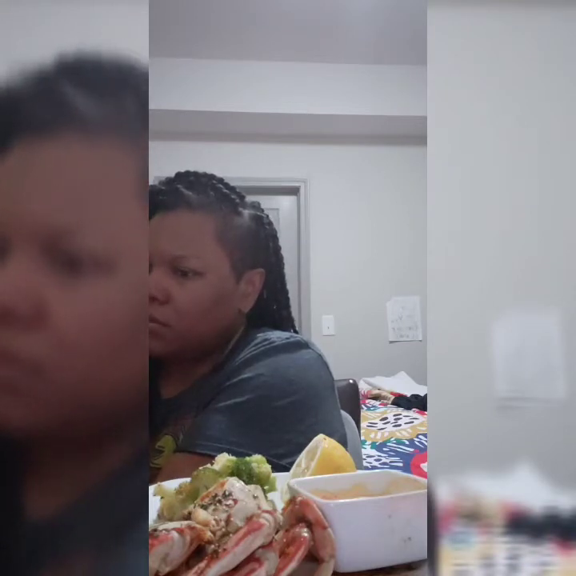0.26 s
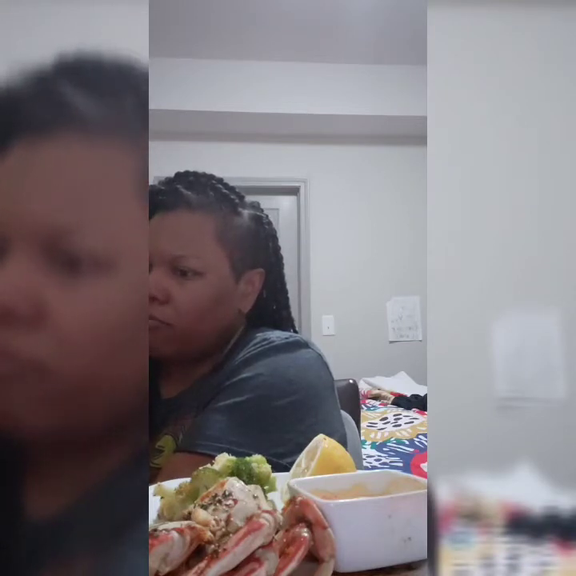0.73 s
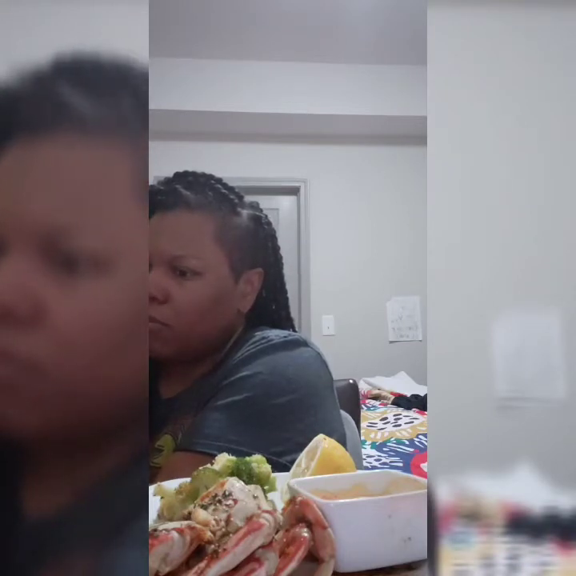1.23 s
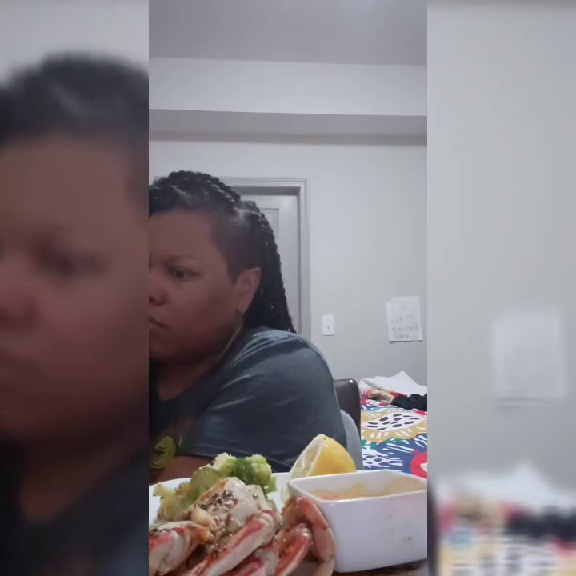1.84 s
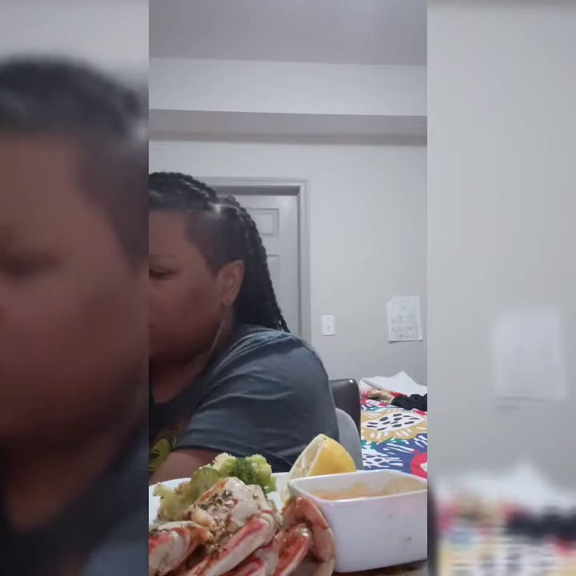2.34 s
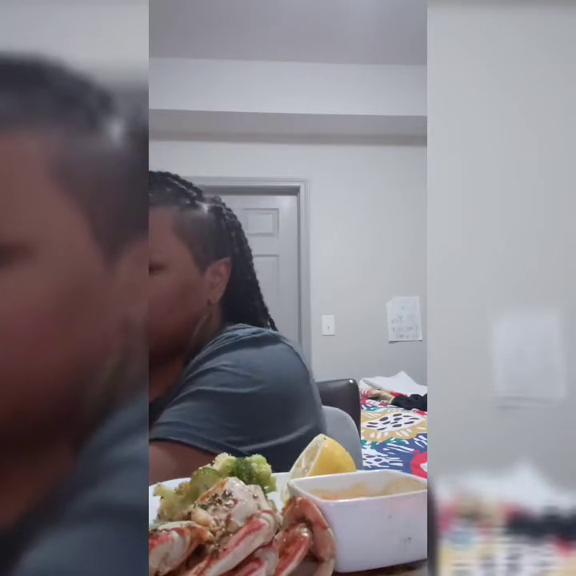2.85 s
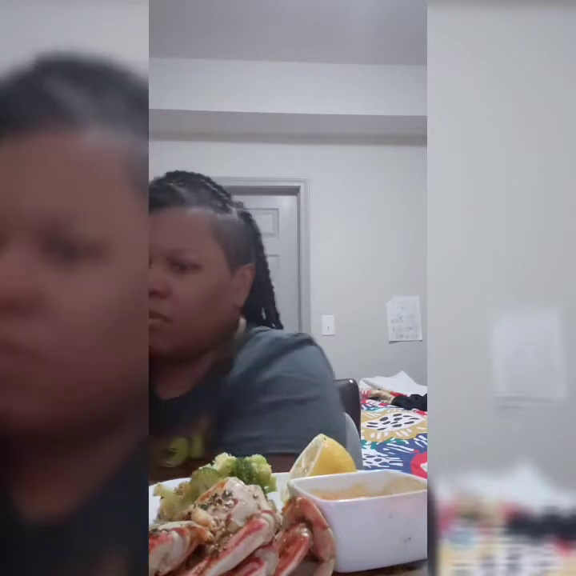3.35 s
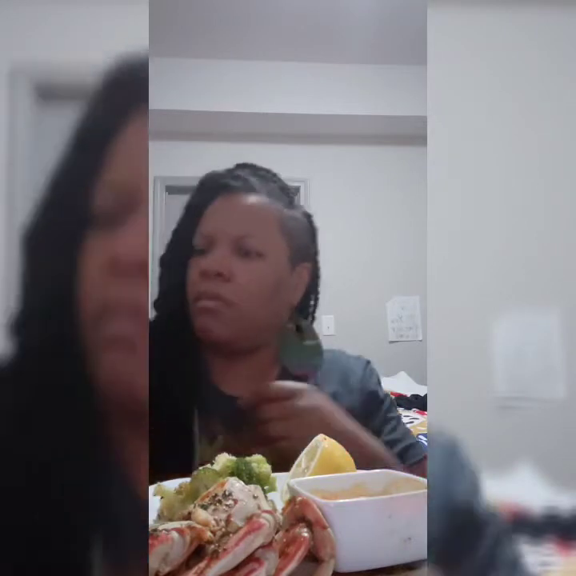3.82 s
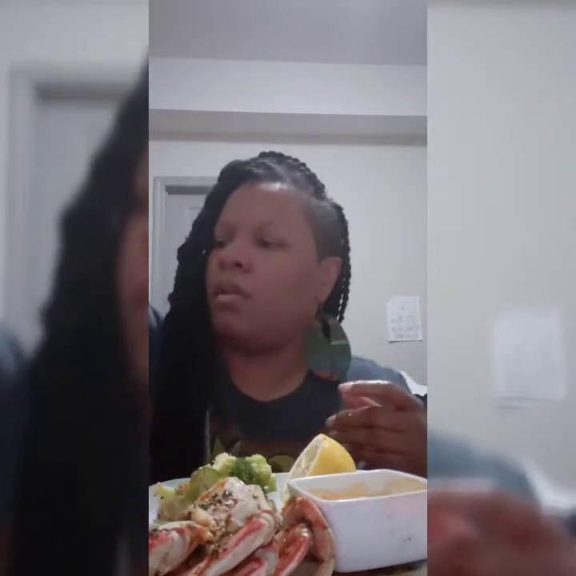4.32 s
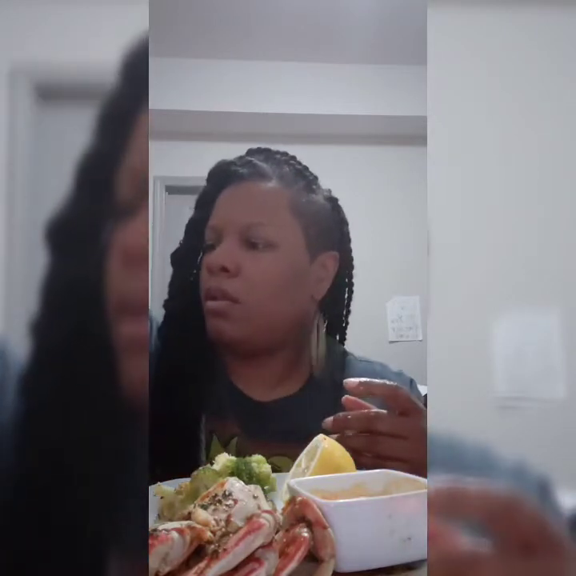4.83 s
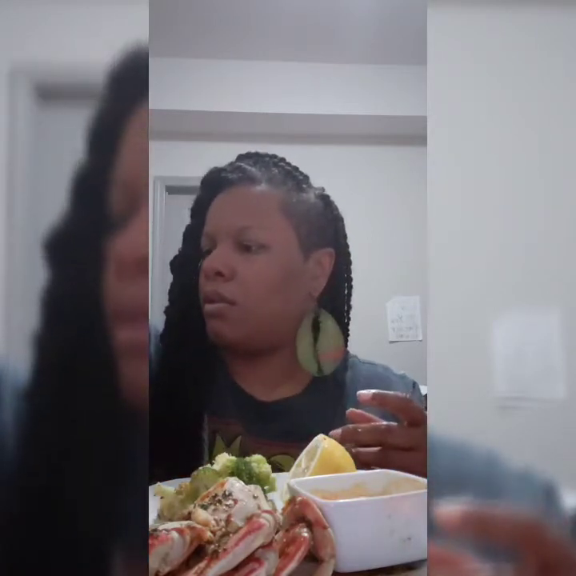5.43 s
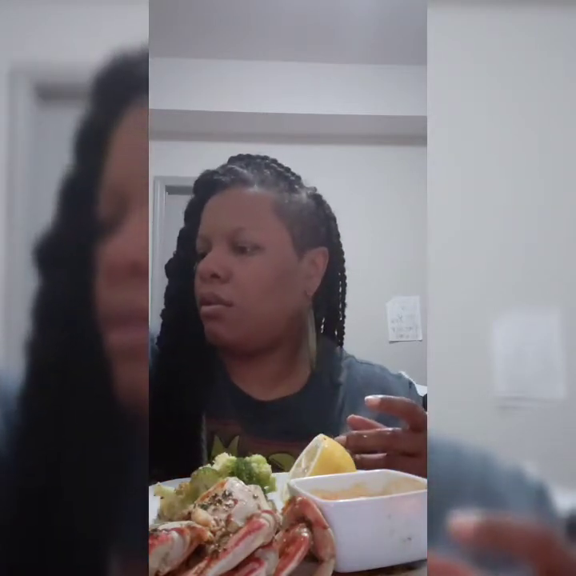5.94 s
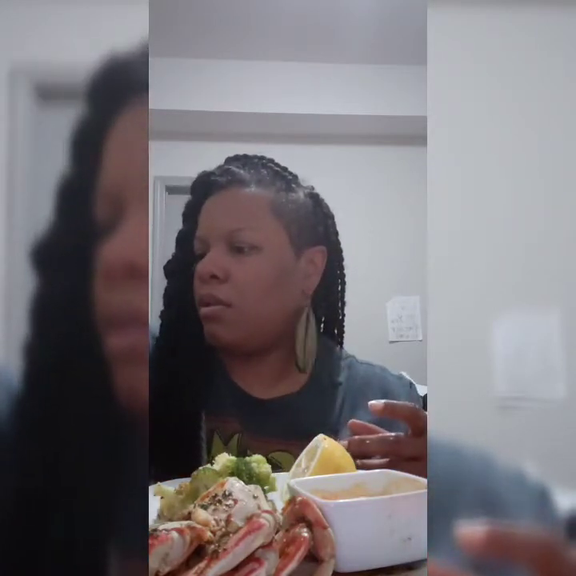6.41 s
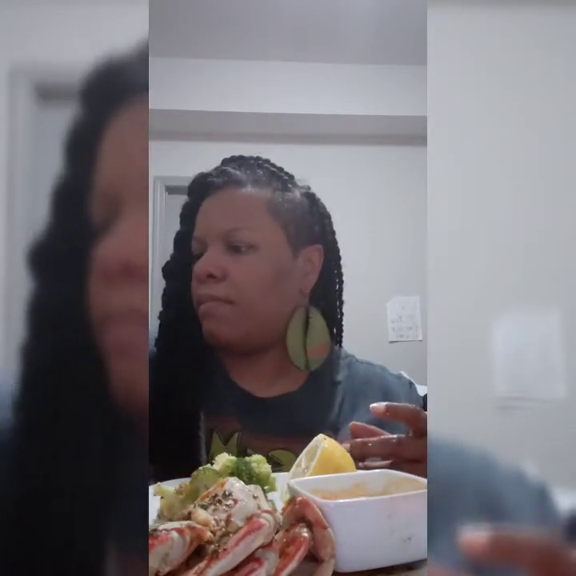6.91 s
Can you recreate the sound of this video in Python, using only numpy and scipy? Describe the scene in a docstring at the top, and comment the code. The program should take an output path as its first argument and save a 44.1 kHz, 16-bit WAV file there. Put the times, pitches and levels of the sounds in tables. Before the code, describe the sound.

A drink fizzes steadily in a glass on a table, one heavy double thump hits near three seconds, then ice cubes clack and rattle against glass.

```python
"""Fizzy drink with ice on a table

A drink fizzes in a glass on a wooden table in a small room, beside a phone with two microphones.
The fizz is noise broken into patches and bursting bubbles. Soft blows thump table and floor, a glass is
tapped, then ice cubes clack and rattle: short bursts of noise ring the modes of glass, ice and wood.
Under it all are a low rumble and a wavering mains hum, both filtered noise, and a few faint gliding tones."""
import sys
import numpy as np
from scipy import signal
from scipy.fft import rfft, irfft, next_fast_len
from scipy.io import wavfile
from scipy.ndimage import uniform_filter1d, map_coordinates

SR = 44100
rng = np.random.default_rng(int(sys.argv[2]) if len(sys.argv) > 2 else 0)


def bounce(signal):
    """Save signal as a 16-bit WAV file at the path given by the first command-line argument."""
    frames = np.transpose(np.atleast_2d(signal))
    limited = np.clip(frames, -1, 1)
    pcm = np.round(limited * 32767).astype(np.int16)
    wavfile.write(sys.argv[1], SR, pcm)


N = 316197  # length in samples


def amp(db):
    """Turns a level in dB into a gain."""
    return 10 ** (np.asarray(db) / 20)


def unit(x):
    """Scales a sound to an rms of 1."""
    return x / np.sqrt(np.mean(x ** 2) + 1e-20)


def peak(x):
    """Scales a sound to a peak of 1."""
    return x / np.abs(x).max()


def along(points, hz):
    """Reads a curve of (Hz, value) points on a logarithmic frequency axis."""
    f, value = np.transpose(points)
    return np.interp(np.log(hz + 1), np.log(f + 1), value)


def level_curve(rows):
    """Gives one gain per sample from (seconds, dB) rows; practically silent outside them."""
    seconds, db = np.transpose(rows)
    return amp(np.interp(np.arange(N) / SR, seconds, db, -150, -150))


def wobble(rate):
    """Draws a smooth random curve through this many random points a second."""
    points = rng.standard_normal(int(N * rate / SR) + 4)
    return map_coordinates(points, [np.arange(N) * rate / SR])


def filtered(x, response):
    """Filters a sound with a response given as a function of frequency."""
    n = x.shape[-1]
    m = next_fast_len(n + SR // 4)
    return irfft(rfft(x, m) * response(np.fft.rfftfreq(m, 1 / SR)), m)[..., :n]


def body(modes):
    """Adds up the resonances of an object, (Hz, width in Hz, dB) each, with alternating signs."""
    def response(f):
        total = 0
        for k, (centre, width, db) in enumerate(modes):
            mode = 1j * f * width / (centre * centre - f * f + 1j * f * width)
            total = total + (-1) ** k * amp(db) * mode
        return total
    return response


def grit(size, per_s):
    """Makes noise that jumps up in short bursts, like tiny separate impacts."""
    hits = 1. * (rng.random(size) < per_s / SR)
    bursts = uniform_filter1d(hits, size=20) * 20  # each hit lasts 20 samples
    return rng.standard_normal(size) * (0.82 + 4 * bursts)


# How alike left and right are. Each row: frequency in Hz, likeness from -1 (opposite) to 1 (same).
LIKENESS = [(60, 0.96), (130, 0.78), (290, 0.95), (640, -0.016), (1410, 0.41), (3100, -0.044),
            (6820, -0.15), (15000, 0.36)]


def rush(spectrum, patchy_db, grain_db=0):
    """Makes patchy stereo noise of rms 1; grain lets single samples stand out as bursting bubbles."""
    white = rng.standard_normal((2, N)) * amp(grain_db * rng.exponential(size=N))
    z = signal.stft(white, nperseg=512)[2]
    field = uniform_filter1d(rng.standard_normal(z.shape[1:]), 6, 0)
    field = uniform_filter1d(field, 10, 1)
    pair = signal.istft(z * amp(patchy_db * unit(field)), nperseg=512)[1][:, :N]

    def colour_and_width(hz):
        turn = np.arccos(np.clip(along(LIKENESS, hz), -1, 1)) / 2
        return amp(along(spectrum, hz)) * [np.cos(turn), np.sin(turn)]

    mid, side = filtered(pair, colour_and_width)
    return unit(np.array([mid + side, mid - side]))


# How long the room rings. Each row: frequency in Hz, time to fade by 60 dB in seconds.
ROOM_FADE = [(100, 0.28), (500, 0.25), (2000, 0.3), (8000, 0.16), (15000, 0.28)]
# Echo from the nearest wall: delay in seconds, level in dB against the direct sound.
WALL_ECHO = (0.013, -13)


def add(out, start_s, sound, room_db):
    """Adds a sound at both microphones: direct, off the wall, and with a fresh random fading room tail."""
    left_lag_s = 1.13e-4  # the left microphone is a little farther away
    hz, t, z = signal.stft(rng.standard_normal((3, SR // 2)), SR, nperseg=256)
    shared = np.clip(along(LIKENESS, hz), 0, 1)[:, None]  # this share reaches both microphones alike
    z = np.sqrt(shared) * z[2] + np.sqrt(1 - shared) * z[:2]
    fade = amp(-60 * t / along(ROOM_FADE, hz)[:, None])
    tail = signal.istft(z * fade, SR, nperseg=256)[1]
    tail = amp(room_db) * tail / np.linalg.norm(tail[0])
    tail = np.pad(tail, ((0, 0), (round(.005 * SR), 0)))  # the tail starts 5 ms late
    tail[[0, 1], [round(left_lag_s * SR), 0]] = 1  # direct sound
    tail[:, round(WALL_ECHO[0] * SR)] += amp(WALL_ECHO[1])
    both = signal.fftconvolve(sound[None], tail, axes=1)
    spot = out[:, round(start_s * SR):][:, :both.shape[1]]
    spot += both[:, :spot.shape[1]]


# Rumble of the building, before its swells. Each row: time in seconds, level in dB.
RUMBLE_LEVEL = [(0, -71), (.7, -73.5), (.9, -70), (3.4, -70), (4.8, -78), (6.3, -73), (7.17, -64.5)]
# Colour of the deep rumble. Each row: frequency in Hz, relative strength in dB per Hz.
DEEP_COLOUR = [(13, -50), (22, -22.5), (43, -1.5), (86, -9), (110, -0.5), (140, -30), (240, -120)]
# Colour of the upper rumble. Each row: frequency in Hz, relative strength in dB per Hz.
UPPER_COLOUR = [(82, -21), (140, 2), (146, -6.5), (189, 1), (368, -9.5), (515, -16.5), (835, -23),
                (1100, -21.5), (1430, -60), (2420, -120)]
# Faint low tones, before the left-right balance.
# Each row: start in seconds, length in seconds, start pitch in Hz, end pitch in Hz, peak level in dB.
FAINT_TONES = [(0, 0.12, 187, 175, -63.5), (0.717, 0.19, 183, 174, -62.5), (1.594, 0.045, 660, 660, -73),
               (1.636, 0.1, 388, 474, -68), (2.75, 0.12, 259, 270, -52.5), (3.128, 0.08, 284.5, 286, -53),
               (3.183, 0.14, 250, 242, -58.5), (3.59, 0.24, 244, 230.6, -68)]


def background():
    """Mixes deep and upper rumble, a hum of narrow-band noise that wavers, and gliding sine tones."""
    upper_db, hum_db, hum_wavers_db = -3.5, 5, 2  # the first two are against the rumble level
    level = level_curve(RUMBLE_LEVEL)
    t = np.arange(N) / SR
    hum = unit(filtered(rng.standard_normal(N), lambda f: body([(119.3, 14, 0)])(f) ** 2))
    line = level * amp(hum_db + hum_wavers_db * wobble(2.44)) * hum
    for start_s, length_s, hz0, hz1, db in FAINT_TONES:
        u = np.clip((t - start_s) / length_s, 0, 1)  # 0 to 1 through the tone
        phase = 2 * np.pi * np.cumsum(hz0 + (hz1 - hz0) * u) / SR
        line += amp(db) * np.sin(np.pi * u) * np.sin(phase)
    deep = amp(4 * wobble(6)) * rush(DEEP_COLOUR, patchy_db=0)
    upper = amp(upper_db) * amp(3 * wobble(9)) * rush(UPPER_COLOUR, patchy_db=3.0)
    return level * (deep + upper) + line * amp([[1.5], [-1.5]])  # hum and tones lean left


# Level of the fine fizz, before its wobble. Each row: time in seconds, level in dB.
FINE_LEVEL = [(0, -53.5), (2.9, -54.5), (3.2, -59), (5.9, -60), (6.35, -63), (7.17, -56.5)]
# Level of the fizz's lower edge, before its wobble. Each row: time in seconds, level in dB.
SPRAY_LEVEL = [(0, -62.5), (1.2, -68.5), (2.6, -69), (3.3, -76), (3.7, -64.5), (5.2, -66), (6.1, -93.5),
               (7.17, -81)]
# Colour of the fine fizz. Each row: frequency in Hz, relative strength in dB per Hz.
FINE_COLOUR = [(1060, -26.5), (1800, -19.5), (2190, -12.5), (2350, -3), (2890, 0.5), (3450, -3.5),
               (3780, 0), (4130, -2.5), (4810, 1.5), (6570, -8), (7510, -1), (8580, -11), (11000, -8),
               (15200, -10), (15600, -35)]
# Colour of the lower edge. Each row: frequency in Hz, relative strength in dB per Hz.
LOWER_COLOUR = [(700, -46), (1400, -14), (1900, -7), (3000, -22.5)]


def fizz():
    """Countless tiny bubbles burst at the surface: grainy bright noise over a patchy lower edge."""
    fine = rush(FINE_COLOUR, patchy_db=1.26, grain_db=1.5)
    fine = level_curve(FINE_LEVEL) * amp(0.1 * wobble(10.0)) * fine
    spray = rush(LOWER_COLOUR, patchy_db=3.5)
    return fine + level_curve(SPRAY_LEVEL) * amp(1.7 * wobble(12)) * spray


# The glass is touched. Each row: start in seconds, peak level in dB before the room.
GLASS_TAPS = [(4.339, -30)]
# Resonances of the glass. Each row: frequency in Hz, width in Hz, level in dB.
GLASS_MODES = [(576, 90, -4.5), (750, 58, -6.5), (1190, 760, -21), (3550, 240, -5), (4030, 470, -14),
               (4940, 290, -6.5), (8300, 1200, -26.5)]


def tap():
    """A short burst of noise rings the glass briefly and roughly, damped by the hand."""
    out, t = np.zeros((2, N)), np.arange(SR // 4) / SR
    for start_s, db in GLASS_TAPS:
        scrape = amp(-60 * t / 0.028) * (1 - np.exp(-t / 0.013)) * rng.standard_normal(len(t))
        add(out, start_s, amp(db) * peak(filtered(scrape, body(GLASS_MODES))), room_db=-1.5)
    return out


# Soft heavy blows. Each row: start in seconds, peak level of the wood in dB before the room,
# level of the slap in dB against that peak before its fade, gain of the floor in dB beside the table.
BLOWS = [(0.952, -57, -13, -14), (1.897, -27.5, -19, -10), (2.711, -51.5, -4.5, -15),
         (2.932, -7.5, -14, 10), (2.941, -11.5, -14.5, 10), (2.952, -17.5, -22, 12.5),
         (3.142, -41.5, -19.5, 21), (5.326, -38, -14, -16), (5.423, -44, -19, -24),
         (5.491, -40.5, -34, -15), (6.615, -41.5, -1.5, -23)]
# Resonances of the floor. Each row: frequency in Hz, width in Hz, level in dB.
FLOOR_MODES = [(52.4, 11, -3), (85, 63, -1), (121, 9.1, 5.5), (166.5, 30, 5), (183, 46, 2.5),
               (473, 160, -6)]
# Resonances of the table top. Each row: frequency in Hz, width in Hz, level in dB.
TABLE_MODES = [(211, 11, 4), (324.4, 30.6, 1.5), (512, 87, -5), (808, 81, -8), (1100, 43, -13.5)]
# Colour of the slap. Each row: frequency in Hz, relative strength in dB per Hz.
SLAP_COLOUR = [(240, -47), (400, -5.5), (452, -1), (612, -5.5), (1090, -7.5), (1720, -18.5), (2290, -13.5),
               (7470, -30.5), (15000, -54.5)]


def thumps():
    """A soft push rings table and floor, and the surfaces slap together as a fading burst of noise."""
    contact_s = 0.0032
    out, t = np.zeros((2, N)), np.arange(SR // 2) / SR
    push = np.sin(np.pi * np.clip(t / contact_s, 0, 1)) ** 2
    for start_s, db, slap_db, floor_db in BLOWS:
        wood = filtered(push, lambda f: body(TABLE_MODES)(f) + amp(floor_db) * body(FLOOR_MODES)(f))
        slap = unit(filtered(grit(len(t), per_s=170), lambda f: amp(along(SLAP_COLOUR, f))))
        slap = slap * amp(-60 * t / 0.14) * (1 - np.exp(-t / 0.0032))
        add(out, start_s, amp(db) * (peak(wood) + amp(slap_db) * slap), room_db=-6)
    return out


# How hard the glass is moved, in two spells, before the left-right balance.
# Each row: time in seconds, level of the table sound in dB.
MOVES = [
    [(5.12, -67), (5.26, -37), (5.38, -60.5), (5.6, -56.5), (5.8, -52), (6.1, -81)],
    [(6.46, -86), (6.7, -46), (6.78, -36.5), (6.84, -43), (6.92, -39), (7.17, -60.5)],
]
# Resonances of ice in a glass. Each row: frequency in Hz, width in Hz, level in dB.
ICE_MODES = [(1320, 2200, -6), (2228, 826, 5), (2900, 1340, 2.5), (3614, 1170, 2.5), (4870, 1000, 0.5),
             (6360, 980, -2), (7640, 780, 0.5)]


def rattle():
    """Small pieces of ice tick densely while the moved glass rubs the table and shakes the floor."""
    ticks_db, shake_db = -3, -7.5  # small ice and floor, against the table
    moved = np.sum([level_curve(spell) for spell in MOVES], axis=0)
    rub = unit(filtered(grit(N, per_s=60), body(TABLE_MODES)))
    shake = unit(filtered(rng.standard_normal(N), lambda f: body([(80, 50, 0)])(f) ** 2))
    tick_gain = amp(3.7 * np.clip(rng.standard_normal(N), -2, 2))
    is_tick = rng.random(N) < 400 / SR  # about 400 ticks a second
    ticks = rng.standard_normal((2, N)) * (0.15 + tick_gain * is_tick)
    ticks = unit(filtered(ticks, body(ICE_MODES)))
    return moved * (rub + amp(shake_db) * shake + amp(ticks_db) * ticks)


# Ice contacts. Each row: start in seconds, peak level of the upper ring in dB before room and balance,
# pitch of the upper ring in Hz, then lower ring, sheen and table knock, each in dB against the upper ring.
ICE_CONTACTS = [(2.8698, -29, 4860, -1.5, -3, -19.5), (2.9265, -45, 2700, 13, -25, -1),
                (2.9388, -25, 7510, 4.5, -12, -12), (5.1279, -26.5, 4573, -10, -9, -9.5),
                (5.1624, -14, 5860, -16.5, 1.5, -14), (5.225, -15.5, 6620, -8, 3, -8),
                (5.2456, -22.5, 4260, -15, -14, -11), (5.5756, -26.5, 4554, -10, -1, -6.5),
                (5.6345, -34, 4160, 0.5, -27.5, -15), (5.693, -27.5, 4520, -2.5, -16, -15),
                (5.7407, -25.5, 4570, 1.5, -12, -13), (5.7699, -20, 4420, -2.5, -16, -20.5),
                (5.8323, -33.5, 4970, -33, -23, -30), (5.9919, -25, 4870, -10.5, -12, -17.5),
                (6.0069, -34.5, 7270, -16, -10, -12), (6.124, -29, 5050, -32.5, 3, -21.5),
                (6.4725, -27.5, 7500, -22, -4, -18.5), (6.4859, -30, 4730, -4, -25, -8.5),
                (6.6375, -32, 4470, 6.5, -15, -1), (6.7216, -19.5, 4740, -3, -23, -4.5),
                (6.7352, -19.5, 4500, 1, -6, -9), (6.7517, -23.5, 7740, 6, -4, 0),
                (6.7758, -26.5, 5200, 7, -34, 6), (6.791, -7.5, 7650, -2.5, -26, -23),
                (6.8588, -12, 6010, -6, -5, -14), (6.8736, -19.5, 6300, 0.5, -18, -6.5),
                (6.8947, -20.5, 5980, 0, -18, -8.5), (6.9338, -23.5, 4540, -3, -13, -9),
                (6.9793, -19, 7560, -8, -12, -9), (7.032, -28.5, 5660, 7, -7, 2),
                (7.0405, -31.5, 4640, 6, -19, -6), (7.1204, -41.5, 3270, 15.5, -20, 8.5),
                (7.1407, -22.5, 6600, -22, -14, -17)]


def clacks():
    """Each cube cracks through the modes of ice in a glass, rings at two pitches and knocks the table."""
    low_ring = 0.4225  # pitch of a cube's lower ring over its upper one
    out, t = np.zeros((2, N)), np.arange(SR // 4) / SR

    def under(f):
        """Keeps the part below about 3300 Hz."""
        return 1 / (1 + 1j * f / 3300) ** 2

    def over(f):
        """Keeps the part above about 3300 Hz, softened at the very top."""
        return (f / 3300) ** 2 * under(f) * under(f / 1.5)

    def shine(f):
        """Lets the highest treble through."""
        modes = body([(10800, 1500, 0), (13000, 2500, 0), (15200, 2500, 0)])
        return modes(f) * body([(13000, 10000, 0)])(f)

    for start_s, db, high_hz, low_db, sheen_db, knock_db in ICE_CONTACTS:
        crack = amp(-60 * t / .005) * rng.standard_normal(len(t))
        crack += amp(-14.0 - 60 * t / 0.036) * grit(len(t), per_s=530)  # the cube chatters after the snap
        low_modes = body([(low_ring * high_hz, 300, 0)])
        high_modes = body([(high_hz, 280, 0)])
        low = filtered(crack, lambda f: under(f) * (low_modes(f) + amp(-2) * body(ICE_MODES)(f)))
        high = filtered(crack, lambda f: over(f) * (high_modes(f) + amp(-8.0) * body(ICE_MODES)(f)))
        sheen = filtered(crack, shine)
        # the table answers more slowly
        thud = amp(-60 * t / 0.036) * (1 - np.exp(-t / 0.0083)) * rng.standard_normal(len(t))
        knock = filtered(thud, body(TABLE_MODES))
        sound = peak(high) + amp(low_db) * peak(low)
        sound += amp(sheen_db) * peak(sheen) + amp(knock_db) * peak(knock)
        add(out, start_s, amp(db) * sound, room_db=-4)
    return out


# The glass is moved sideways. Each row: time in seconds, left minus right in dB.
GLASS_PLACE = [(2.901, -3), (5.202, -1), (6.2, -4), (6.801, -0.5)]


def scene():
    """Adds everything up at the microphones; clacks and rattle follow the place of the glass."""
    pan_db = np.interp(np.arange(N) / SR, *np.transpose(GLASS_PLACE))
    ice = (clacks() + rattle()) * amp([pan_db / 2, -pan_db / 2])
    return background() + fizz() + tap() + thumps() + ice


# How the phone's body shades its microphones. Each row: frequency in Hz, left minus right in dB.
PHONE_SHADE = [(60, -4), (150, 0.5), (380, -2.5), (950, 3), (2380, 1), (5980, -4.5), (15000, 0)]
# How the phone's treble ends. Each row: frequency in Hz, gain in dB.
TREBLE_END = [(15200, 0.5), (16500, -23)]


def record(dry):
    """The phone shades its two microphones differently and keeps nothing above its band limit."""
    top_hz = 16500

    def phone(hz):
        shade_db = np.outer([.5, -.5], along(PHONE_SHADE, hz))
        return amp(shade_db + along(TREBLE_END, hz)) * (hz < top_hz)

    return filtered(dry, phone)


dry = scene()
out = record(dry)
bounce(out)
```